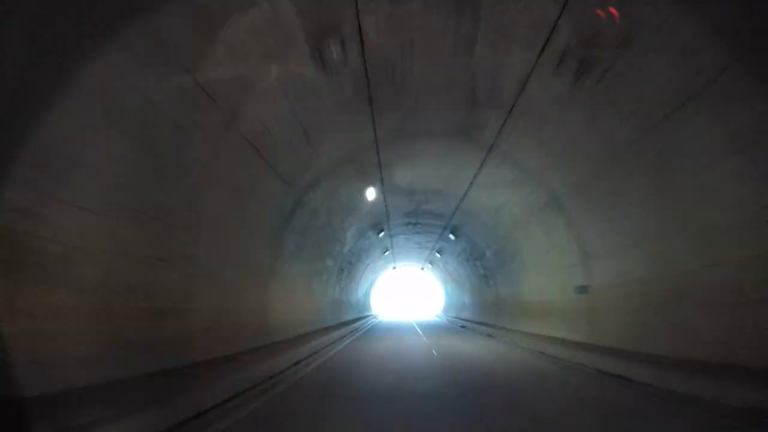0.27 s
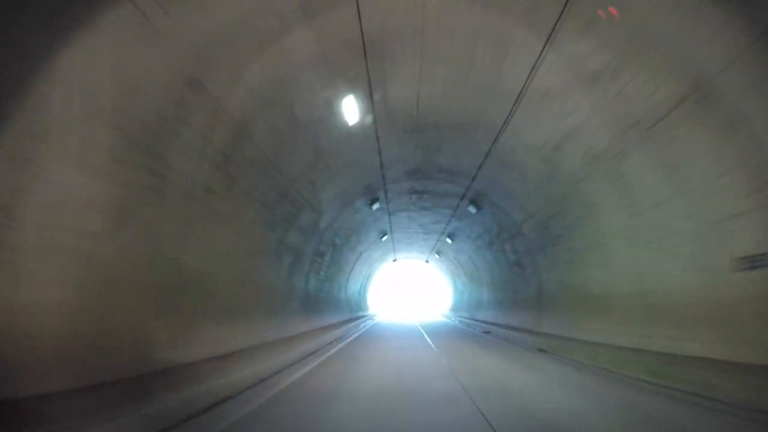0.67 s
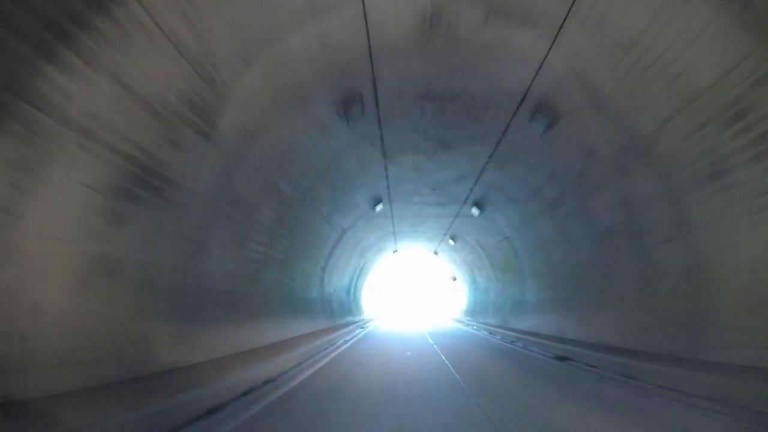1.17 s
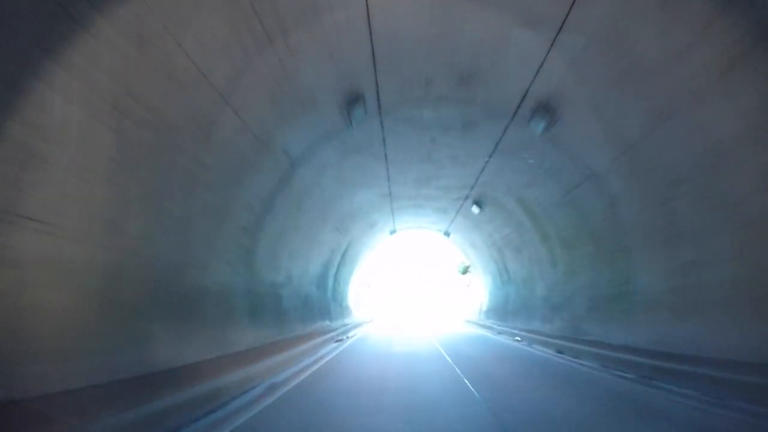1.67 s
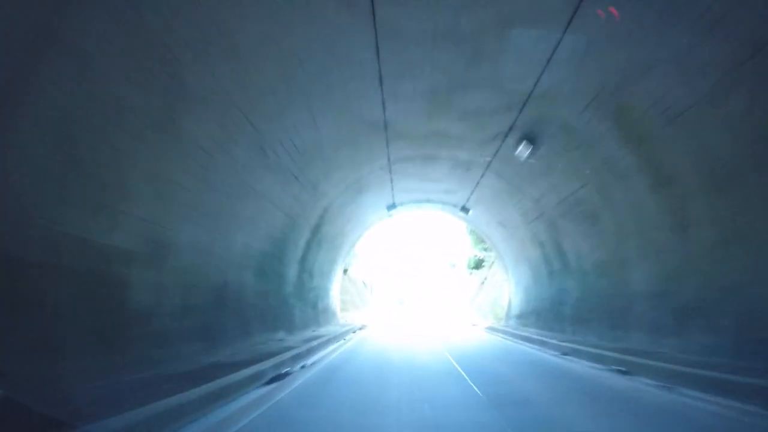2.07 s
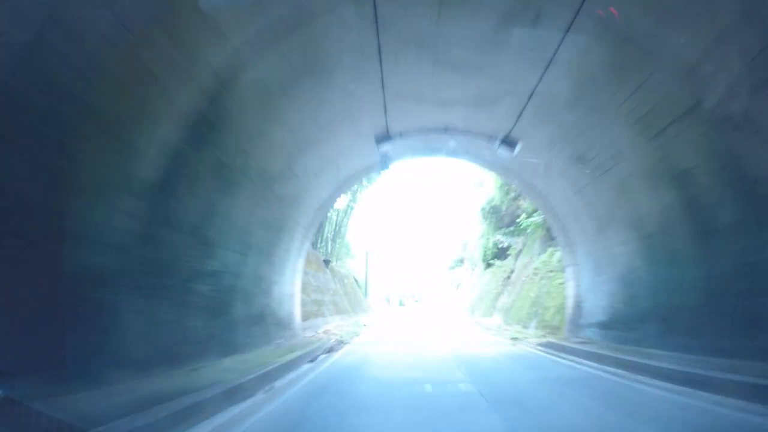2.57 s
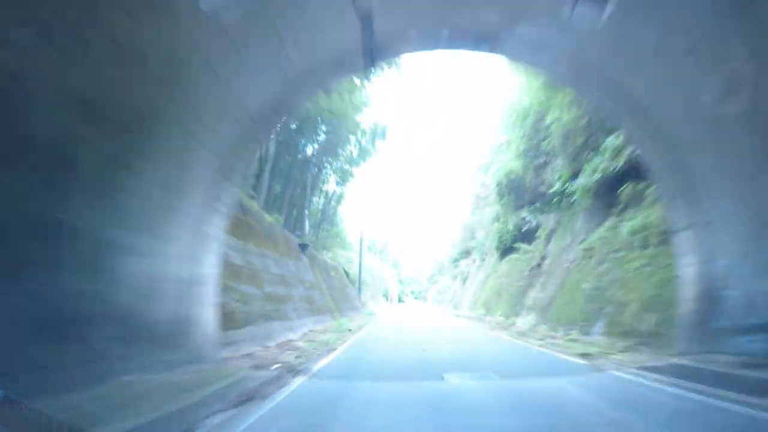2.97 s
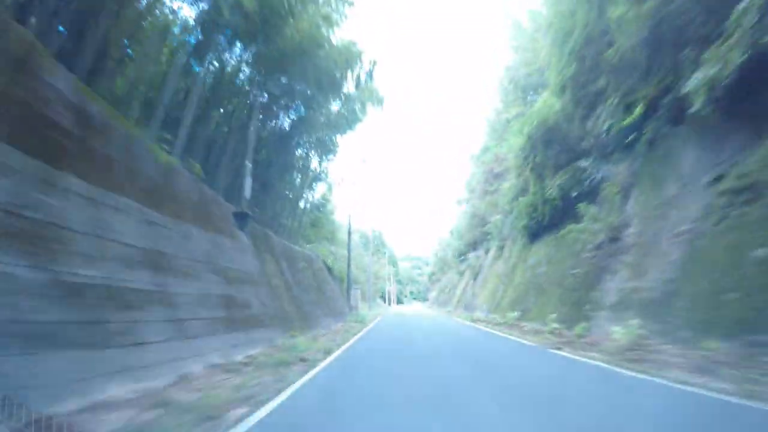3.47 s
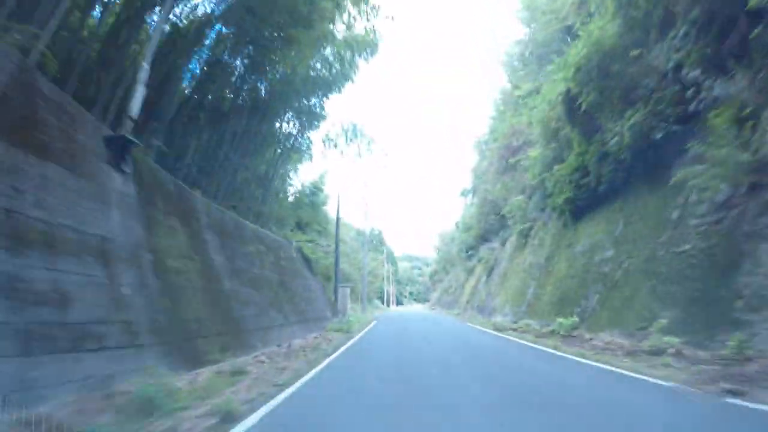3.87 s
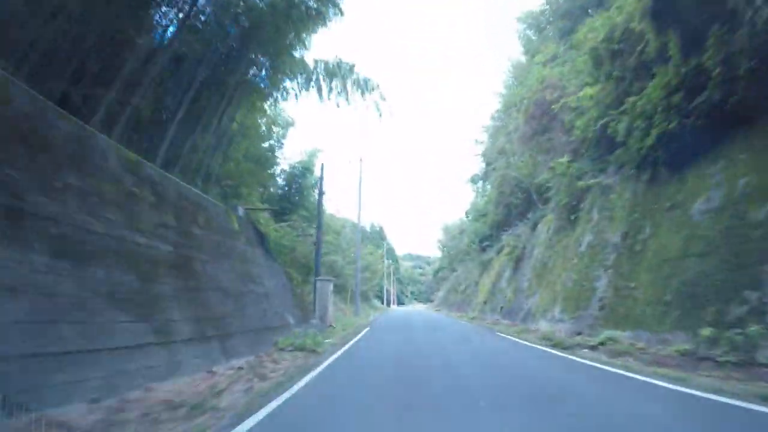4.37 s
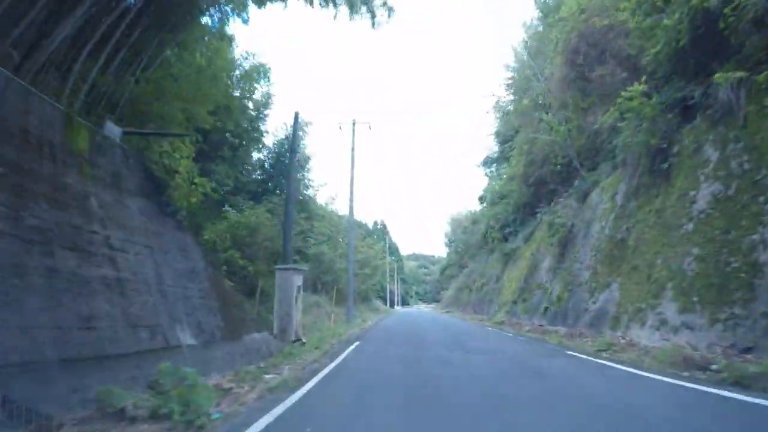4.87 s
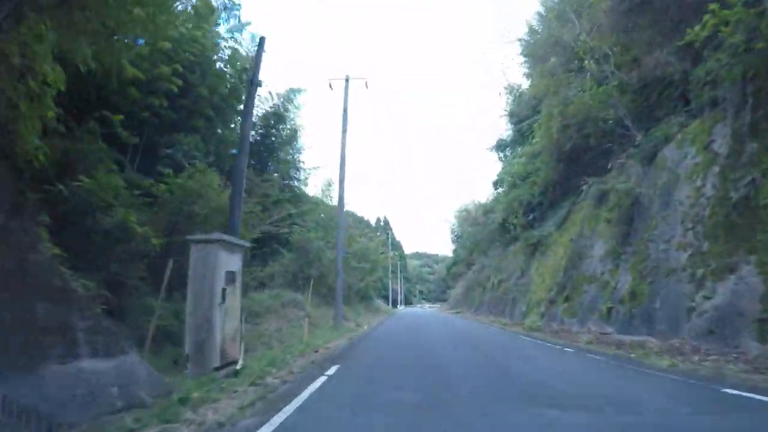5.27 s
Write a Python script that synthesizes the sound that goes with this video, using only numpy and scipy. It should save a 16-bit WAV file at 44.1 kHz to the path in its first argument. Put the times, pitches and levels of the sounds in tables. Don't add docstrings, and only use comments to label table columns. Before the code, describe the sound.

A car drives out of a road tunnel with a deep restless low boom, muffled tyre roar and occasional sharp plastic clicks from loose trim.

```python
import sys
import numpy as np
from scipy import signal
from scipy.fft import irfft
from scipy.io import wavfile
from scipy.ndimage import uniform_filter1d, minimum_filter1d

SR = 44100
rng = np.random.default_rng(int(sys.argv[2]) if len(sys.argv) > 2 else 0)


def nominal_scale(level):
    x = np.asarray(level, float) / 20
    return 10 ** x


def digitize_waveform(pressure):
    field = np.atleast_2d(pressure).T
    bounded = np.clip(field, -1, 1)
    quanta = np.round(bounded * 32767).astype(np.int16)
    wavfile.write(sys.argv[1], SR, quanta)


N = 243413


def evened(x):
    return x / np.sqrt(np.mean(x ** 2) + 1e-20)


def peaked(x):
    return x / np.sqrt(uniform_filter1d(x ** 2, size=130).max())


def columns(rows, t):
    s, *values = np.transpose(rows)
    return [np.interp(t, s, v) for v in values]


def add(mix, s, sound):
    part = mix[round(s * SR):][:len(sound)]
    part += sound[:len(part)]


def band(x, low_hz, high_hz):
    sections = signal.butter(4, [low_hz, high_hz], "bandpass", fs=SR, output="sos")
    return signal.sosfilt(sections, x)


def resonate(x, hz, width):
    turn = np.exp(2j * np.pi * hz * np.arange(len(x)) / SR)
    r = np.exp(-np.pi * width / SR)
    return 2 * (turn * signal.lfilter([1 - r], [1, -r], x / turn)).real


def ping(u, db, hz, t60, rise_s):
    return nominal_scale(db - 60 * u / t60) * np.sin(2 * np.pi * hz * u) * (1 - np.exp(-u / rise_s))


def noise(spectrum, patchy_db, flicker_db, size=1024):
    frames, hz = 4 * N // size + 5, np.fft.rfftfreq(size, 1 / SR)
    a, b, patches = rng.standard_normal((frames, len(hz), 3)).T
    patches = uniform_filter1d(patches, size=9, axis=0)
    patches = evened(uniform_filter1d(patches, size=9, axis=1))
    flicker = evened(uniform_filter1d(rng.standard_normal(frames), size=5))
    f, db = np.transpose(spectrum)
    shape_db = np.interp(np.log(hz + 1), np.log(f + 1), db)[:, None]
    field = (a + 1j * b) * nominal_scale(shape_db + patchy_db * patches + flicker_db * flicker)
    return evened(signal.istft(field, nperseg=size, noverlap=3 * size // 4)[1][:N])


def tone(hz, db, waver, last_turn):
    drift = np.interp(np.arange(N), np.linspace(0, N, 56), rng.standard_normal(56))
    turns = np.cumsum(hz + waver * drift) / SR
    return np.sqrt(2) * nominal_scale(db) * np.sin(2 * np.pi * (turns - turns[-1] + last_turn))


def gust_db(t):
    peak_s, rise_s, fall_s = 2.97, .28, .3
    return 2.5 * np.exp(-((t - peak_s) / np.where(t < peak_s, rise_s, fall_s)) ** 2)


def layer_db(t, db, surface_share, gust_share):
    # (time [s], level [dB])
    surface = [(0, 1), (.3, -1.5), (.6, 0), (.9, 1), (1.3, -0.5), (1.55, -4.5), (1.85, -2.5), (2.25, -2.5),
               (2.8, -0.5), (3, 1.5), (3.3, 0), (3.8, -1.5), (4.15, -2), (4.55, 4), (4.85, 2.5), (5.15, 2),
               (5.35, 4), (5.52, 3)]
    return db + surface_share * columns(surface, t)[0] + gust_share * gust_db(t)


def spray(t):
    # (frequency [Hz], density [dB per Hz])
    puffs = [(8000, -60), (10500, -8), (11500, -0.5), (13000, -6), (14500, -13.5), (16000, -40.5)]
    return nominal_scale(layer_db(t, -81, .5, 1.5)) * noise(puffs, patchy_db=2, flicker_db=2.5, size=512)


def air(t):
    # (frequency [Hz], density [dB per Hz])
    hiss_spectrum = [(150, -63.5), (300, 0), (420, 12), (520, 11.5), (600, 6), (750, 3), (1000, -3.5),
                     (1600, -9), (2000, -14), (3500, -20.5), (5000, -28), (6500, -31.5), (10000, -51),
                     (14000, -90)]
    # (frequency [Hz], density [dB per Hz])
    fizz_spectrum = [(500, -56), (2000, -7), (4500, -0.5), (6200, -2), (7200, 0.5), (8800, 1.5),
                     (10500, -4), (11500, -13), (12500, -19.5), (13500, -27.5), (15000, -33.5),
                     (20000, -48.5)]
    portal_s, portal_fade_s, walls_gain_db = 3.43, .15, 6.5
    walls_db = walls_gain_db / (1 + np.exp((t - portal_s) / portal_fade_s))
    outside_db = 2 * np.maximum(t - 4.1, 0)
    hiss = noise(hiss_spectrum, patchy_db=.9, flicker_db=.3, size=512)
    fizz = noise(fizz_spectrum, patchy_db=0.7, flicker_db=0.86, size=512)
    hiss_db = layer_db(t, -40.5, 0.59, 0.85) + walls_db
    fizz_db = layer_db(t, -61.5, 0.56, 1.1) + outside_db
    return nominal_scale(hiss_db) * hiss + nominal_scale(fizz_db) * fizz


def road(t):
    # (frequency [Hz], density [dB per Hz])
    roar = [(35, -27.5), (60, 5), (80, -5.5), (125, -7), (160, -15.5), (210, -18), (300, -53), (500, -93),
            (1000, -140)]
    # (frequency [Hz], density [dB per Hz])
    drone = [(60, -92), (120, -28.5), (200, -1), (260, -3.5), (335, 0), (400, -1), (520, -16), (590, -8),
             (700, -27.5), (900, -40), (1500, -74), (3000, -130)]
    # (time [s], level [dB], ring [Hz], t60 [s])
    bumps = [(1.335, -24.5, 1196, 0.055), (1.328, -16, 580, 0.055), (1.335, -25, 866, 0.08),
             (2.951, -6, 298, 0.1), (2.7, -24, 396, 0.072), (3.09, -24.5, 418, 0.99),
             (3.851, -6, 338, 0.032), (5.25, -19.5, 74, 0.56), (0.45, -21, 105, .3), (.8, -24, 128, .3),
             (2.17, -22.5, 104, 0.32), (3.86, -20.5, 150, 0.31), (5.27, -22.5, 178, 0.39),
             (5.07, -18.5, 345, .25), (5.26, -21.5, 350, 0.27), (2.972, -31, 1600, 0.04),
             (2.982, -12, 260, 0.066), (4.74, -22, 290, 0.24), (0.13, -26, 110, .2), (2.55, -27, 122, .2),
             (3.36, -25.5, 180, 0.24), (2.971, -12, 330, .05), (.211, -14, 400, .04), (2.9, -16, 560, .05),
             (3.02, -16, 400, .08), (3.105, -17, 440, .1), (3.345, -16, 450, .08)]
    out = nominal_scale(layer_db(t, -23.5, 0.4, 0.17)) * noise(roar, patchy_db=1.1, flicker_db=-.8, size=4096)
    out += nominal_scale(layer_db(t, -31, 0.91, 0.83)) * noise(drone, patchy_db=1.32, flicker_db=-0.83, size=2048)
    u = t[:SR // 2]
    for s, db, hz, t60 in bumps:
        add(out, s, ping(u, db, hz, t60, rise_s=0.0096))
    return out


def engine(t):
    # (time [s], rate [Hz], level [dB])
    firing = [
        (0, 89.4, -43),
        (1.5, 80.5, -51),
        (2.1, 76.16, -30),
        (2.95, 71.76, -25),
        (3.3, 68.64, -36),
        (3.9, 62.35, -38),
        (4.3, 59.42, -23),
        (4.6, 56.78, -23),
        (5, 54.9, -28),
        (5.52, 53.02, -29.5),
    ]
    hz, db = columns(firing, t)
    second_db = np.minimum(db - 10, -32)
    return tone(hz, db, .3, 3 / 4) + tone(2 * hz, second_db, .4, rng.random())


def noise_swells():
    # (peak time [s], level [dB], low edge [Hz], high edge [Hz], build-up [s])
    swell_rows = [(.184, -55, 8000, 13000, .012), (0.19, -45, 4500, 6800, 0.011),
                  (1.66, -56.5, 8500, 11200, .01), (2.281, -55.5, 8000, 13500, .012),
                  (2.978, -57, 7500, 12000, 0.0089), (3.02, -62, 5000, 13000, 0.042),
                  (3.39, -64, 1500, 7000, .015), (1.04, -56, 1500, 5500, 0.027), (2.17, -61, 1500, 6000, 0.037),
                  (5.376, -52.5, 8000, 12000, .01), (5.377, -48, 8000, 9600, .003),
                  (1.338, -50, 1400, 4500, .002), (.19, -40, 800, 4400, .007), (2.285, -37, 700, 3700, .005),
                  (.197, -40, 1000, 4000, .005), (2.284, -41, 3000, 6600, .002),
                  (2.284, -49, 12000, 14500, .003), (5.376, -38, 900, 2200, .002),
                  (1.3385, -44, 1500, 4500, .0015), (.193, -38, 5300, 6500, .002),
                  (3.063, -47, 1700, 4500, .004), (2.284, -39, 900, 2500, .003), (2.292, -39, 800, 2600, .004),
                  (2.976, -35, 700, 2400, .005), (1.342, -36, 600, 1400, .007), (3.386, -46, 1200, 3200, .005)]
    out, u = np.zeros(N), np.arange(-6000, 6000) / SR
    for s, db, low_hz, high_hz, build_s in swell_rows:
        crackle = evened(band(rng.standard_normal(len(u)), low_hz, high_hz))
        add(out, s + u[0], nominal_scale(db) * np.exp(-abs(u) / build_s) * crackle)
    return out


def click(db, ring_hz, panel_hz, panel_db, sizzle_db, manner):
    # (ratio to panel pitch [1], width [Hz], level [dB])
    panel_modes = [(0.621, 250, 2), (1, 200, 30), (1.401, 250, 7), (1.8, 220, 6), (2.2, 300, -12.5),
                   (3, 500, -18.5)]
    # (frequency [Hz], width [Hz], level [dB])
    clip_modes = [(3800, 140, -4), (4960, 640, -23.5), (4600, 99, -4), (5300, 670, 0.5), (5730, 570, -11)]
    contact_t60, tail_t60, tail_db, crack_db = manner
    u = np.arange(4000) / SR
    a, b = rng.standard_normal((2, len(u)))
    clumps = nominal_scale(1.8 * evened(uniform_filter1d(b, size=40)))
    chatter = a * clumps * (1 - np.exp(-u / .0012))
    contact, tail = nominal_scale(-60 * u / contact_t60), nominal_scale(tail_db - 60 * u / tail_t60)
    force = chatter * (contact + tail)
    ring = 3.5 * resonate(force, ring_hz, 620)
    ring = ring + sum(nominal_scale(d) * resonate(force, f, w) for f, w, d in clip_modes)
    panel = sum(nominal_scale(d) * resonate(force, r * panel_hz, w) for r, w, d in panel_modes)
    panel = panel + nominal_scale(1) * force
    sizzle = band(chatter * nominal_scale(-60 * u / .019), 12000, 14700)
    crack = band(chatter * contact, 7000, 11500)
    low = peaked(band(ring, 3340, 7600)) + nominal_scale(panel_db + 4.0) * peaked(band(panel, 400, 4100))
    high = nominal_scale(sizzle_db + 7.5) * peaked(sizzle) + nominal_scale(crack_db) * peaked(crack)
    return nominal_scale(db - 9.5) * (low + high)


def clicks():
    # (time [s], peak [dB], ring [Hz], panel [dB], sizzle [dB])
    snaps = [(0.171, -38, 5300, -20, -36), (0.181, -26, 5300, -3, -27.5), (0.1846, -19, 5950, -18, -22),
             (0.188, -25.5, 5830, 1, -25), (.196, -29, 5100, -8, -28), (.201, -30, 5017, -12, -34),
             (0.208, -34, 5100, -9, -36), (.216, -41, 5400, -9, -38), (1.659, -32, 5600, -21, -17.5),
             (1.663, -37, 4350, 5.5, -20), (1.674, -44, 5600, -5, -25), (2.2803, -30.5, 5700, 6.5, -17.5),
             (2.287, -34, 5167, -16, -32), (2.297, -43, 5500, -6, -36), (2.308, -47, 5200, -8, -36),
             (5.3731, -32.5, 5900, -6, -15), (5.375, -36, 4340, -7, -11)]
    # (time [s], peak [dB], ring [Hz], panel pitch [Hz], panel [dB])
    taps = [
        (1.336, -34.5, 6500, 1179, -0.5),
        (1.337, -50, 6300, 1250, 12),
        (2.9765, -32.5, 6600, 815, -2),
        (3.444, -47, 4680, 861, -5),
        (3.595, -51, 4950, 869, 1),
        (3.619, -49, 5400, 916, 6),
        (4.4926, -44, 6000, 867, -9),
        (4.612, -41.5, 5920, 1154, -7),
    ]
    # (time [s], peak [dB], ring [Hz], panel [dB])
    rustles = [(.16, -47, 5500, -13), (1.31, -45, 5300, 5), (1.655, -45, 4330, 9), (2.946, -48, 6000, -4.5),
               (2.972, -48, 4500, 20), (3.008, -46.5, 4600, 14), (3.024, -45, 4600, 10),
               (3.058, -40.5, 5500, 9), (3.0649, -44, 3930, 2), (3.098, -50, 4300, 6),
               (3.379, -48, 5940, 5), (5.363, -45, 6000, -6)]
    # (time [s], level [dB], ring [Hz], t60 [s])
    ticks = [(1.326, -47, 9000, .012), (1.329, -44, 9000, .012), (1.332, -46, 9000, .012),
             (1.3362, -38, 6600, .015), (1.338, -36, 2300, .02), (2.265, -57, 6000, .1),
             (2.271, -53, 6000, .12), (1.314, -52, 5600, .08), (2.968, -49, 9300, .03),
             (2.976, -42, 9100, .012), (5.364, -46, 8800, .02), (5.377, -42, 8900, .015),
             (5.378, -45, 10400, .015)]
    # contact t60 [s], tail t60 [s], tail [dB], crack [dB]
    rattling, dry_tap, smeared = (0.03, .075, -10, -19), (.014, .06, -15, -12), (0.5, -0.3, -3, -12.5)
    snap_panel_hz, soft_sizzle_db = 940, -35
    out, u = np.zeros(N), np.arange(2000) / SR
    for s, db, ring_hz, panel_db, sizzle_db in snaps:
        add(out, s, click(db, ring_hz, snap_panel_hz, panel_db, sizzle_db, rattling))
    for s, db, ring_hz, panel_hz, panel_db in taps:
        sizzle_db = soft_sizzle_db + .6 * max(db + 45, 0)
        add(out, s, click(db, ring_hz, panel_hz, panel_db, sizzle_db, dry_tap))
    for s, db, ring_hz, panel_db in rustles:
        add(out, s, click(db, ring_hz, snap_panel_hz, panel_db, soft_sizzle_db, smeared))
    for s, db, hz, t60 in ticks:
        add(out, s, ping(u, db, hz, t60, rise_s=.0007))
    return out


def lulls(rows, t):
    coarse = t[::64]
    drops_db = sum(db * np.exp(-((coarse - s) / half_s) ** 2) for s, db, half_s in rows)
    return np.interp(t, coarse, drops_db)


def body(t):
    # (time [s], pitch [Hz], level [dB])
    shake_curve = [(0, 23.85, -15.5), (0.34, 23.78, -10.5), (0.5, 25.07, -9.5), (0.86, 25.6, -6.5),
                   (1.0, 24.75, -11), (1.38, 23.84, -9), (1.71, 27, -13), (1.96, 26.09, -13.1),
                   (2.48, 25.01, -9), (2.75, 25.97, -11.5), (3.16, 23.6, -8), (3.63, 27.91, -14.5),
                   (3.91, 27.11, -9.5), (4.15, 24.97, -12), (4.33, 25.46, -11), (4.66, 24.74, -10.5),
                   (4.97, 25.5, -13.5), (5.52, 24.54, -11.5)]
    # (time [s], pitch [Hz], level [dB])
    boom_curve = [(0, 50.8, -11), (.45, 53.2, -17.5), (.63, 47.4, -11.5), (1.04, 49.07, -12),
                  (1.29, 50.77, -11.5), (1.63, 48.63, -10.5), (2.03, 46, -11.5), (2.4, 46.04, -14),
                  (2.6, 55.01, -14.5), (2.85, 50, -10), (3.1, 47.04, -10.5), (3.55, 47.51, -12.5),
                  (3.75, 55.01, -13.5), (4.06, 49.45, -13), (4.3, 58.02, -14), (4.6, 50.97, -15),
                  (4.9, 53.97, -11), (5.52, 51.03, -15.5)]
    # (time [s], depth [dB], half length [s])
    shake_lulls = [(0.4, -13, 0.018), (0.67, -9, 0.089), (0.82, -5, 0.019), (0.95, -4, 0.028),
                   (1.27, -2.5, 0.062), (1.65, -6, 0.051), (1.9, -6.5, 0.03), (2.02, -6, 0.023),
                   (2.16, -12, 0.026), (2.22, -11, 0.09), (2.54, -20, 0.029), (2.67, -19, 0.031),
                   (2.84, -13, 0.032), (2.95, -2, 0.024), (3.12, -4.5, 0.019), (3.2, -18, 0.013),
                   (3.36, -9, 0.022), (3.45, -23, 0.029), (3.55, -15, 0.013), (3.7, -6, 0.043),
                   (3.87, -14, 0.026), (4.03, -22, 0.063), (4.1, -11, 0.07), (4.27, -23, 0.029),
                   (4.39, -10.5, 0.043), (4.52, -12, 0.043), (4.79, -7, 0.069), (4.9, -4, 0.025),
                   (5.1, -3, 0.043), (5.21, -16, 0.016), (5.3, -6, 0.03)]
    # (time [s], depth [dB], half length [s])
    boom_lulls = [(0.13, -14, 0.02), (0.39, -22, 0.01), (0.48, -16, 0.054), (0.73, -11, 0.016),
                  (0.88, -25, 0.074), (1.1, -7.5, 0.02), (1.21, -24, 0.019), (1.36, -23, 0.041),
                  (1.51, -12, 0.059), (1.57, -5.5, 0.02), (1.74, -14.5, 0.034), (1.83, -1.5, 0.018),
                  (2.2, -6, 0.019), (2.4, -11, 0.053), (2.47, -12, 0.027), (2.54, -6, 0.02),
                  (2.74, -20, 0.045), (2.91, -6.5, 0.045), (3.0, -23, 0.031), (3.16, -5, 0.018),
                  (3.23, -11, 0.018), (3.32, -6, 0.041), (3.49, -8, 0.018), (3.56, -10, 0.023),
                  (3.89, -12, 0.083), (4.15, -16, 0.023), (4.23, -9.5, 0.018), (4.32, -16, 0.018),
                  (4.38, -14, 0.016), (4.48, -17, 0.021), (4.68, -21, 0.044), (4.87, -9, 0.058),
                  (5.11, -2, 0.017), (5.3, -21, 0.041)]
    # (frequency [Hz], density [dB per Hz])
    sway_spectrum = [(3, -30), (7, -12), (13, -6), (19, -4), (30, -3), (37, -2), (50, -5), (62, -6),
                     (90, -26), (150, -66), (300, -140)]
    downswing = 3 / 4
    sway = nominal_scale(-21) * noise(sway_spectrum, patchy_db=4.5, flicker_db=3.5, size=16384)
    shake = nominal_scale(lulls(shake_lulls, t)) * tone(*columns(shake_curve, t), 0.88, downswing)
    boom = nominal_scale(lulls(boom_lulls, t)) * tone(*columns(boom_curve, t), 1.21, downswing)
    return shake + boom + sway


def scene():
    t = np.arange(N) / SR
    return (spray(t) + air(t) + road(t) + engine(t) + noise_swells() + clicks() + body(t))[None]


def band_limit(x):
    return signal.sosfilt(signal.butter(12, 15710, fs=SR, output="sos"), x)


def record(dry):
    # (frequency [Hz], gain [dB])
    housing_curve = [(0, -0.5), (6500, -2.5), (7000, -7.5), (7500, -6), (8300, -2.5), (14900, 0.5),
                     (15400, -22), (22050, -40)]
    self_noise_db, ceiling_db, look_ahead = -80, -3.7, 2500
    hz, db = np.transpose(housing_curve)
    response = nominal_scale(np.interp(np.fft.rfftfreq(256, 1 / SR), hz, db))
    housing = np.fft.fftshift(irfft(response))
    heard = signal.oaconvolve(np.pad(dry[0], 128, "edge"), housing, "valid")[None, :N]
    heard = heard + nominal_scale(self_noise_db) * rng.standard_normal(N)
    heard = heard * np.minimum(np.arange(N) / 150, 1)
    slow = abs(uniform_filter1d(heard, size=60))
    room = np.minimum(nominal_scale(ceiling_db) / (slow + 1e-9), 1)
    gain = uniform_filter1d(minimum_filter1d(room, size=look_ahead), size=look_ahead)
    return band_limit(heard * gain)


dry = scene()
out = record(dry)
digitize_waveform(out)
```